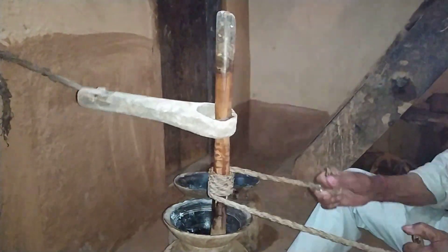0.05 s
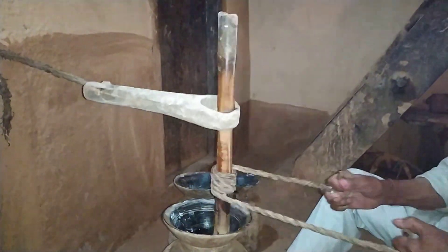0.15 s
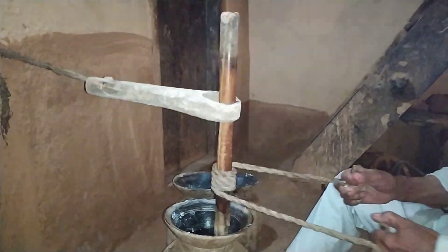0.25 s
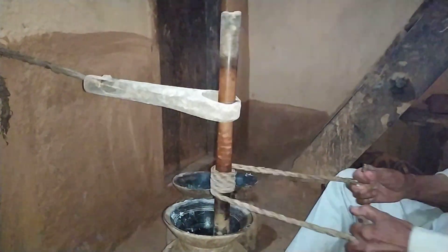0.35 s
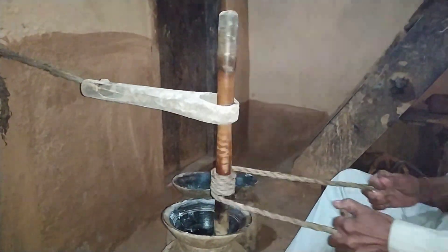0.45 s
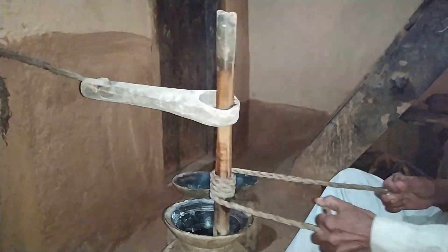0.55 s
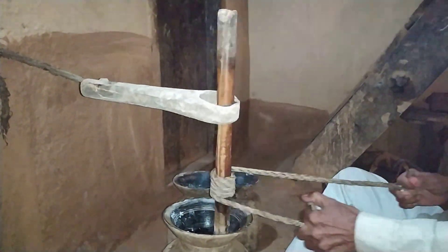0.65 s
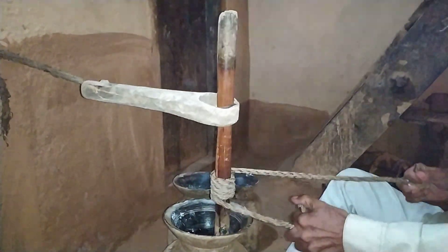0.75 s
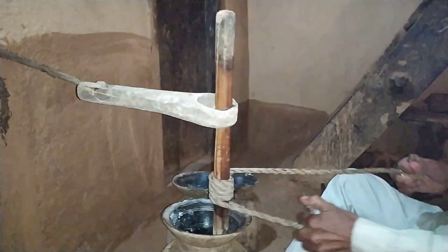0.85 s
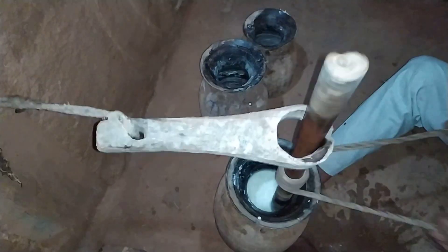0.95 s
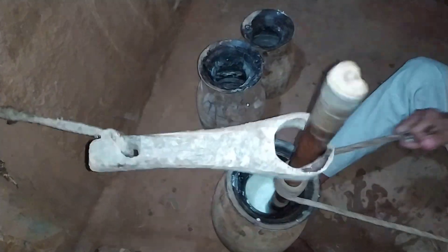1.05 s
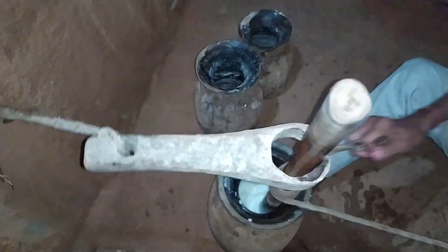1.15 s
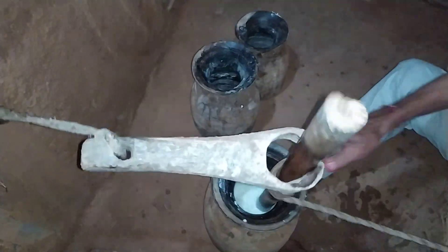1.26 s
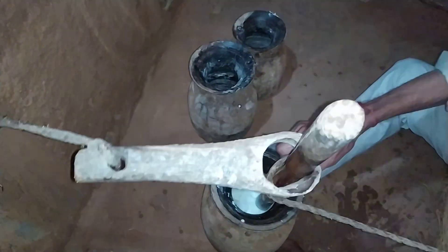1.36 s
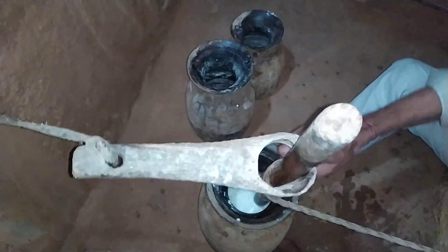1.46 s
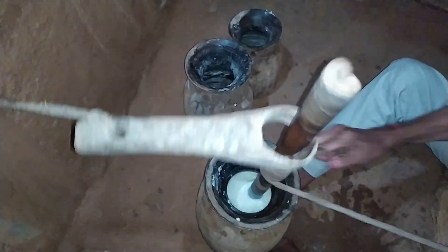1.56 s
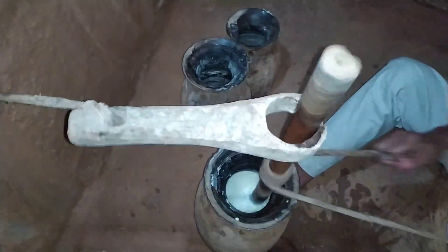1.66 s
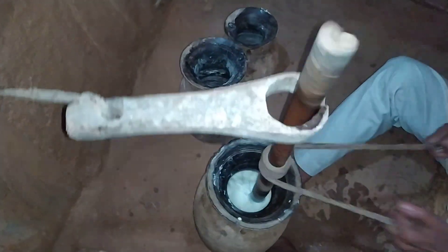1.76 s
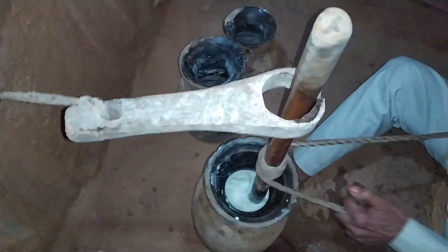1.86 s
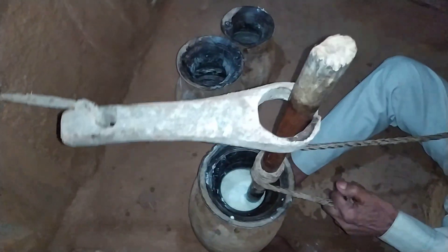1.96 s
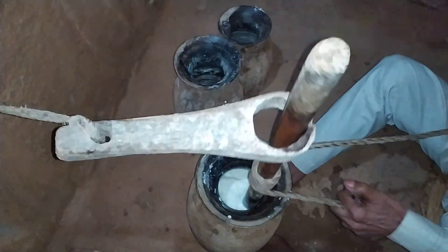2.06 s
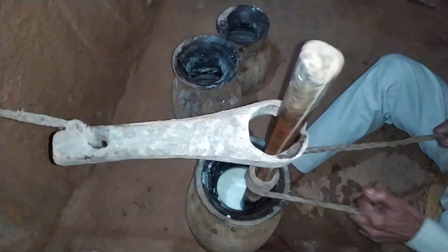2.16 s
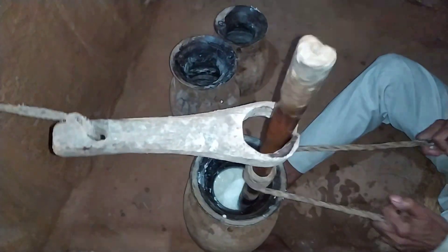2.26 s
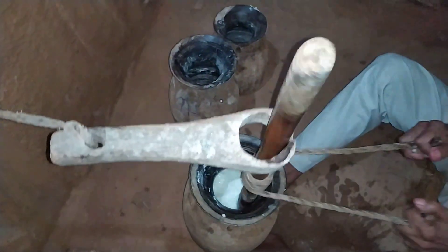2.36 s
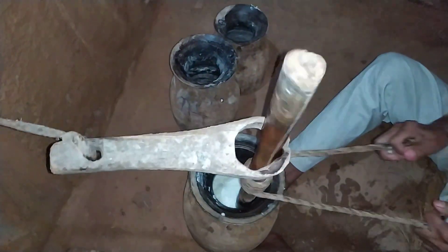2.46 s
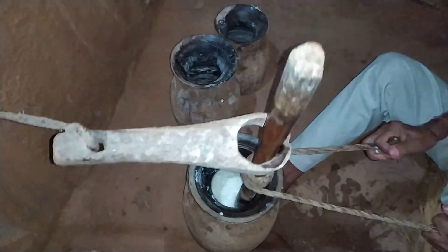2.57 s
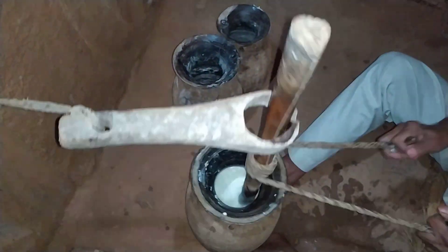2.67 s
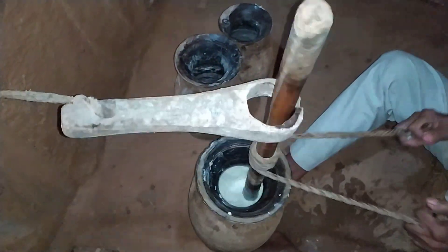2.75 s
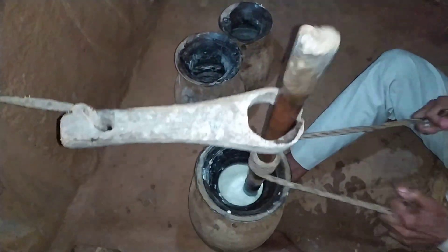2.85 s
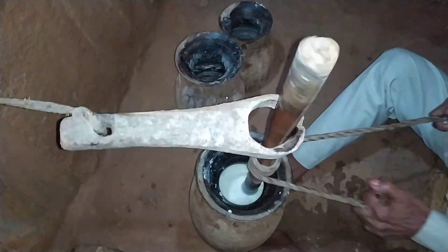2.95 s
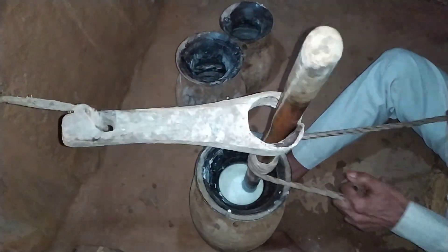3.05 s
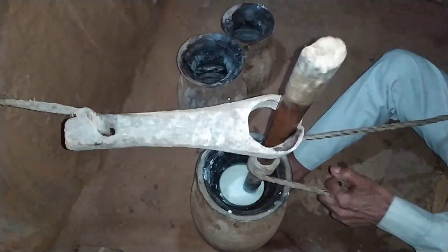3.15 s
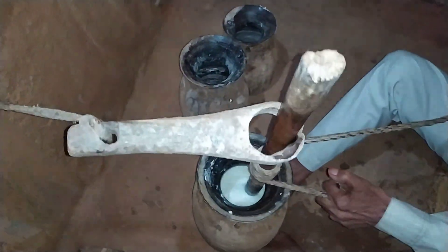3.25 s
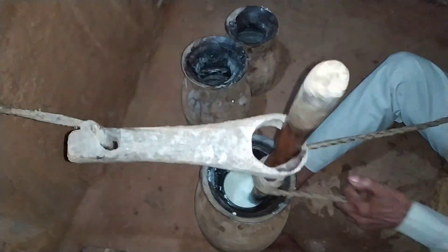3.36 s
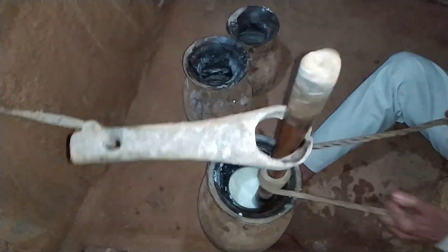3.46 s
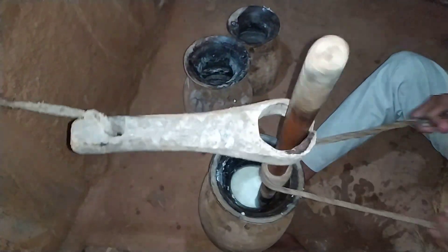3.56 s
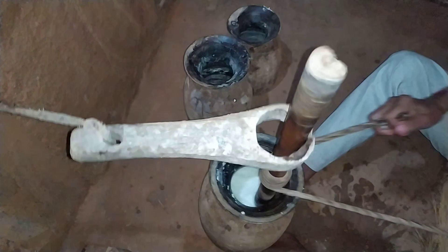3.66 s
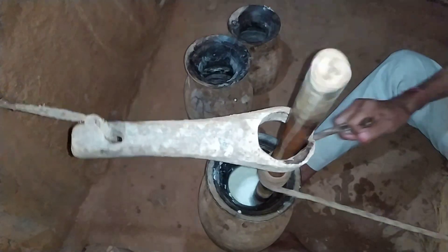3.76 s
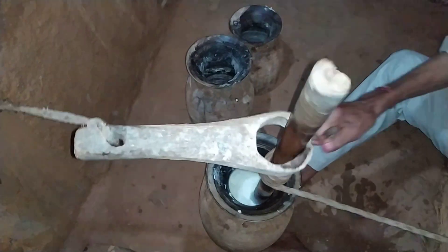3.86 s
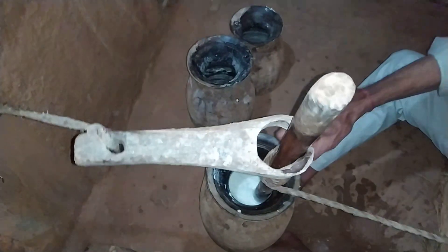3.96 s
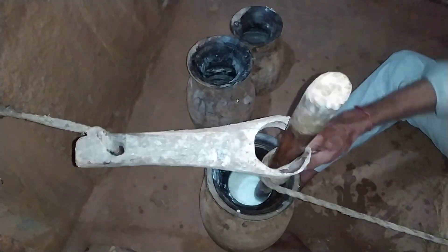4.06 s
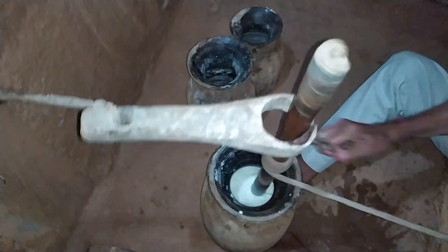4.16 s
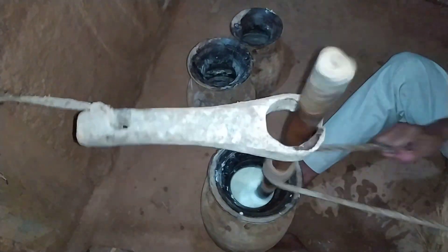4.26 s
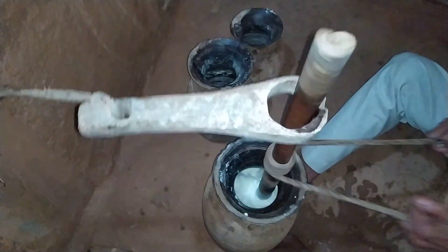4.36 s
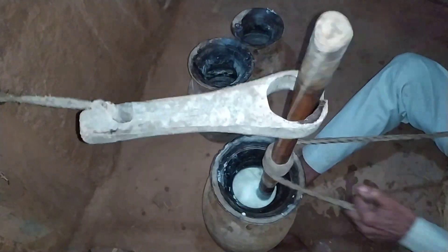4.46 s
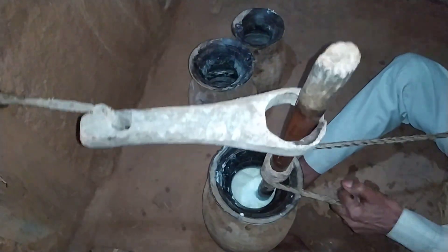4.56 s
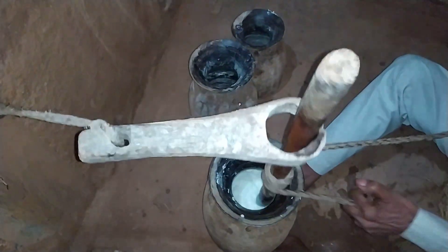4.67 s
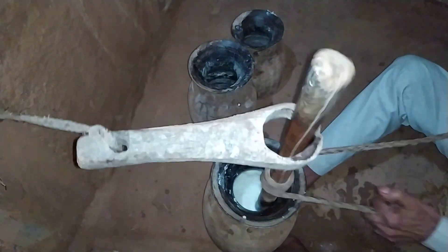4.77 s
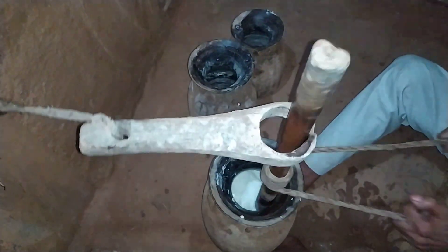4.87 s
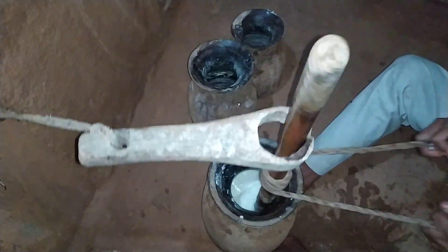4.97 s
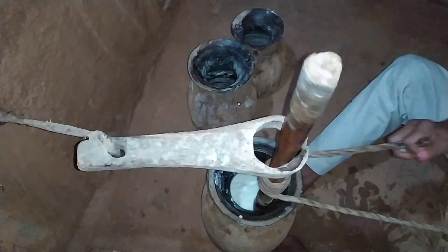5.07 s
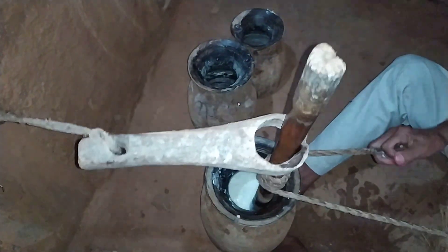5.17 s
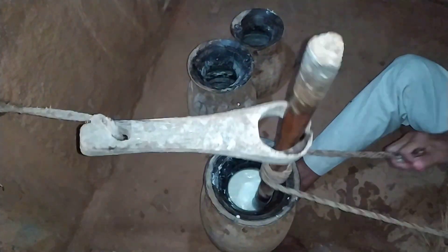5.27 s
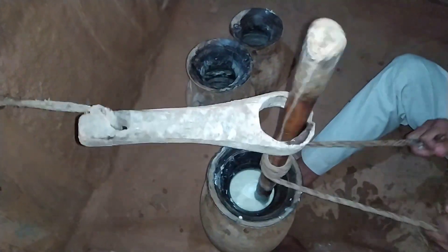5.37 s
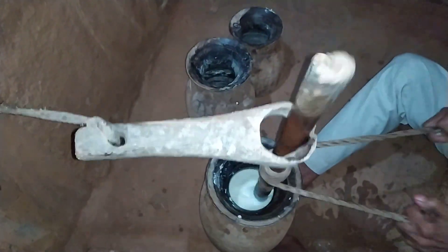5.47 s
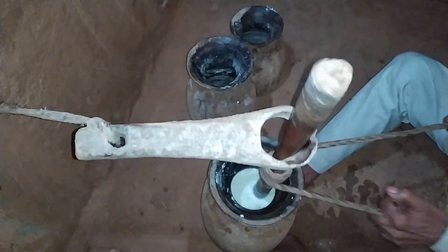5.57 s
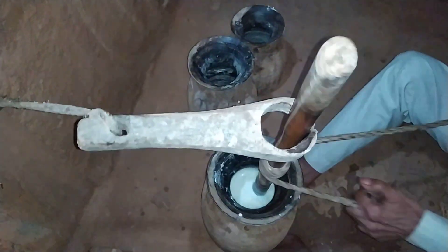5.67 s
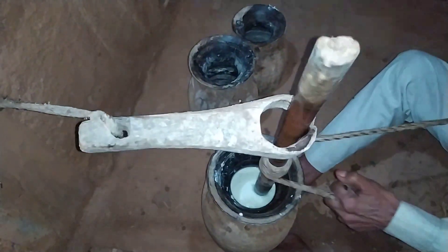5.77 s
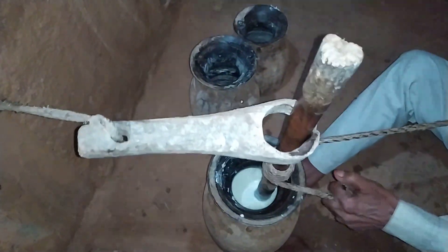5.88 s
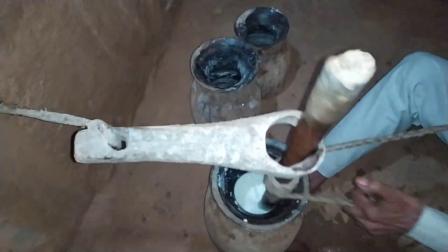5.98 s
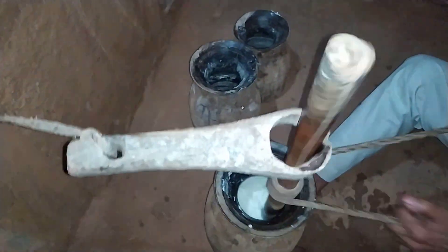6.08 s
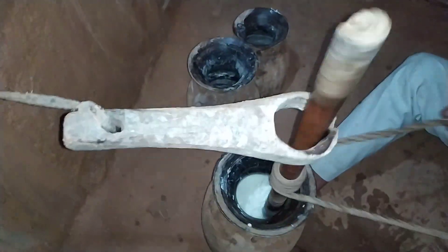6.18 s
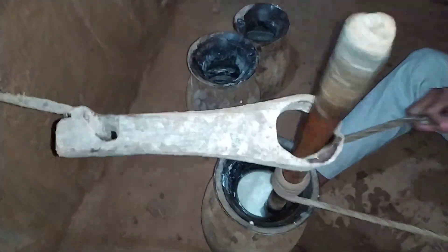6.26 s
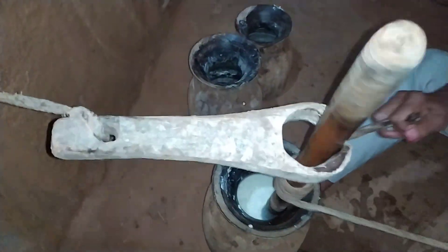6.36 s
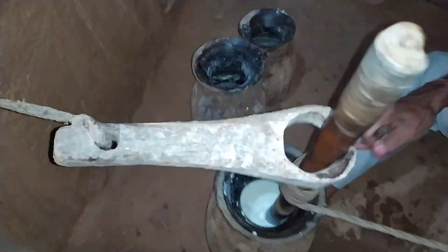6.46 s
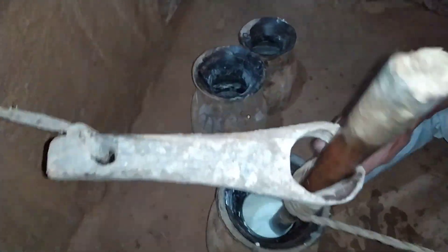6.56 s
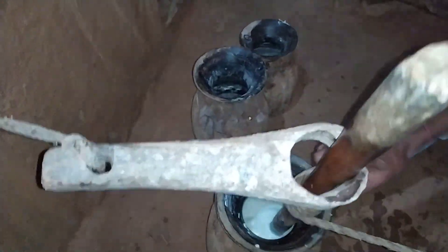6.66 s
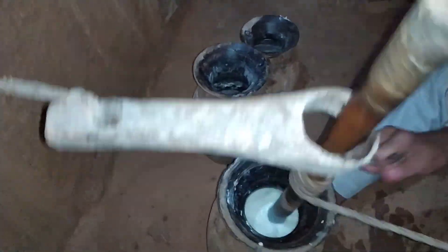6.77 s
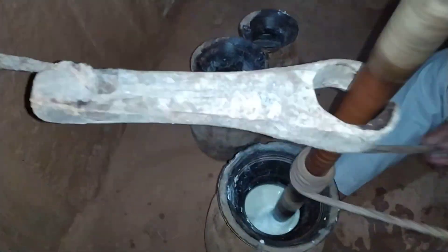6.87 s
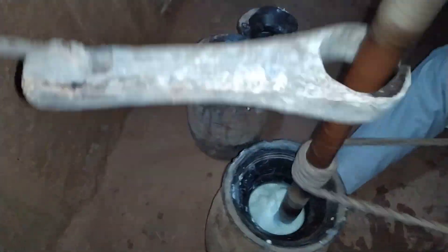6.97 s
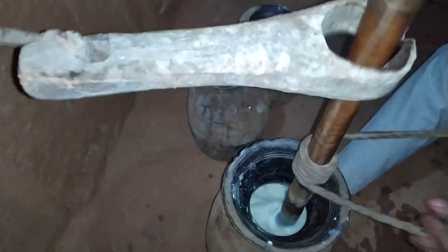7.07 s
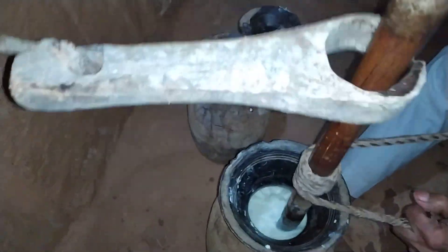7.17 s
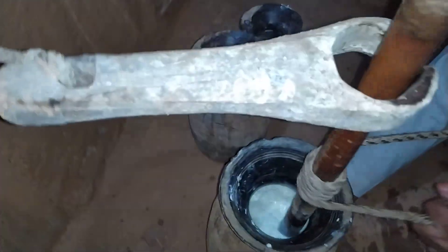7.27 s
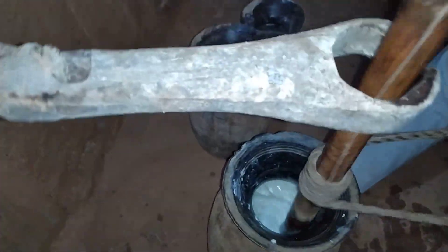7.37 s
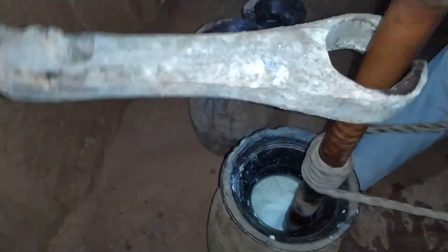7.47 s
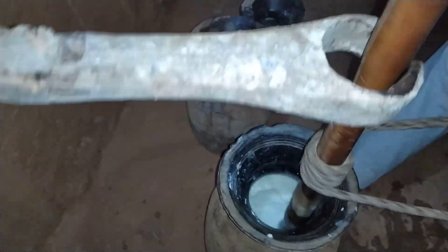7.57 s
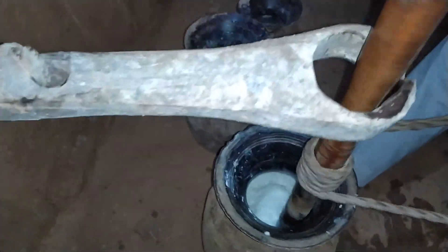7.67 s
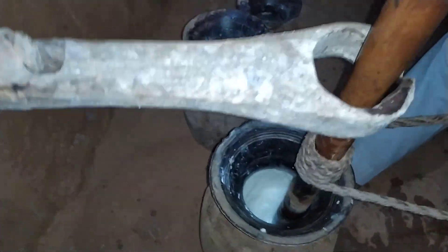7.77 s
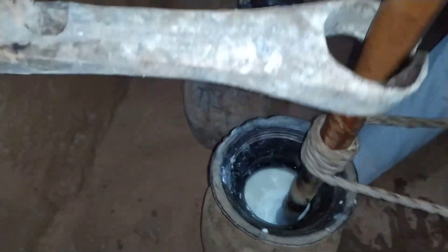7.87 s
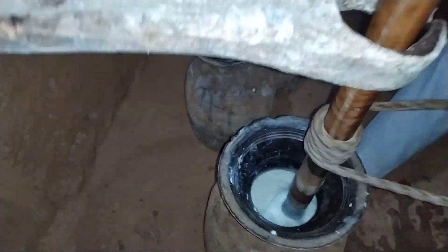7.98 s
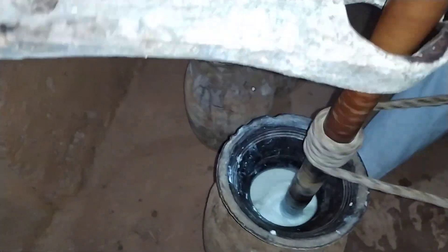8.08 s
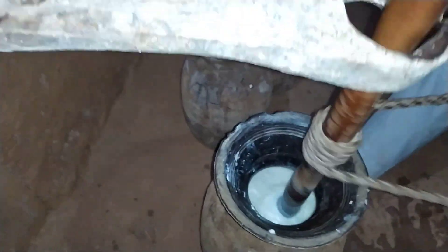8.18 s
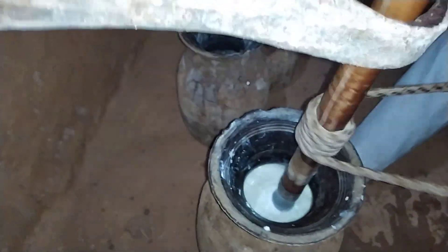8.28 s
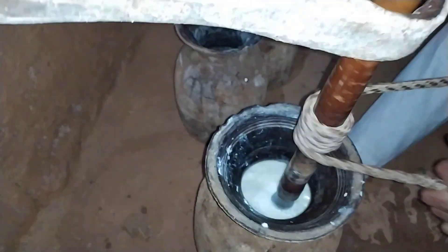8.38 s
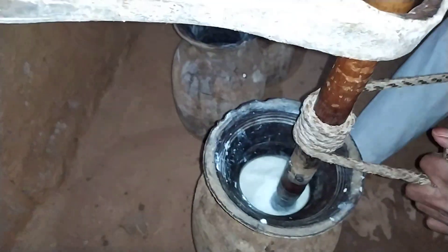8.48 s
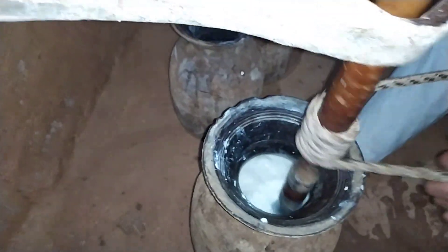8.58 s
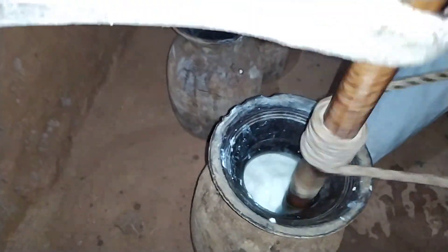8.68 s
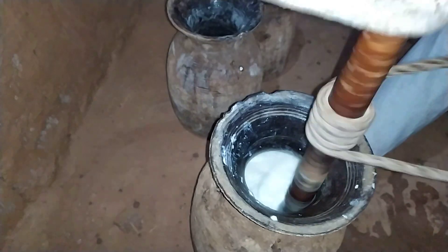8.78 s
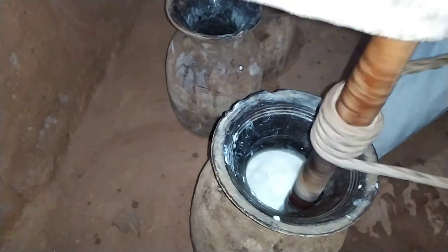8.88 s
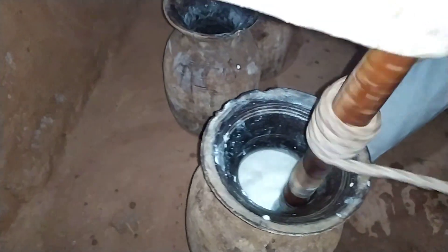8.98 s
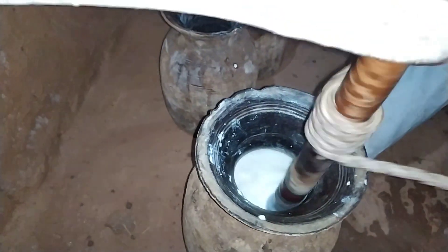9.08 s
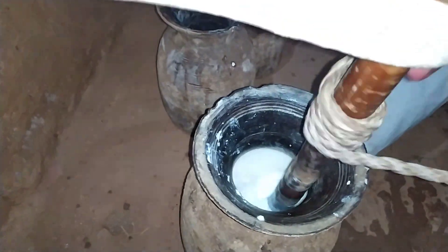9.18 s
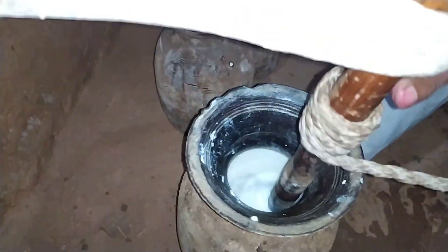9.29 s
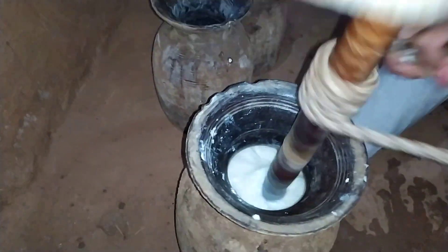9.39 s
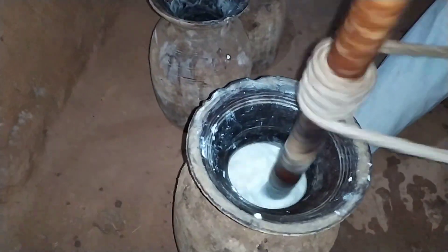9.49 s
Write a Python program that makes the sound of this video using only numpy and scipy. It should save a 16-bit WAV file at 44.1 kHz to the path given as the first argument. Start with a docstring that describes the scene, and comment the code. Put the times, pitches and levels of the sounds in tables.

```python
"""Churning milk by hand

A wooden churning stick is spun to and fro by a rope in a clay pot of milk, in a small earthen room.
The paddle gulps air under the milk: swelling tones drive the pot's air resonances into booms.
The shaft's clacks are noise bursts through wood rings; rubbing and rope rasps are trains of stick-slip
clicks. Froth is filtered clicks that grow with the stick's speed; hard and gentle pulls alternate."""
import sys
import numpy as np
from scipy import signal
from scipy.fft import rfft, irfft
from scipy.io import wavfile
from scipy.ndimage import uniform_filter1d

SR = 44100
rng = np.random.default_rng(int(sys.argv[2]) if len(sys.argv) > 2 else 0)


def wav_record(signal):
    """Record a signal, one row per channel, as 16-bit PCM in the file named by sys.argv[1]."""
    frames = np.transpose(np.atleast_2d(signal))
    bounded = np.clip(frames, -1, 1)
    # unit amplitude maps onto the largest positive 16-bit level
    quanta = np.round(bounded * 32767).astype(np.int16)
    wavfile.write(sys.argv[1], SR, quanta)


N = 420273
TIME = np.arange(N) / SR
CONTROL_TIME = TIME[::100]  # coarse steps for slow movements
SIDES = np.array([[1], [-1]])  # adds a side signal to the left, subtracts it from the right

# pulls of the rope: (start [s], run-up [s], run-down [s],
#   sloshing at full speed [dB], rubbing at full speed [dB], froth hiss at full speed [dB])
ROPE_PULLS = [(0.102, 0.37, 0.11, -43, -68, -55), (0.779, 0.27, 0.37, -26.5, -35.5, -47.5),
              (1.485, 0.15, 0.3, -20.5, -22.5, -31.5), (1.989, 0.11, 0.46, -39, -43, -55.5),
              (2.55, 0.23, 0.36, -42, -56, -56.5), (3.229, 0.38, 0.32, -31.5, -44.5, -50.5),
              (4.03, 0.24, 0.28, -22, -34.5, -42), (4.581, 0.24, 0.32, -36, -45, -56),
              (5.13, 0.26, 0.44, -40.5, -57, -57), (5.901, 0.29, 0.46, -31, -41, -50),
              (6.65, 0.24, 0.29, -20.5, -24, -39.5), (7.19, 0.2, 0.35, -35, -40, -53),
              (7.75, 0.23, 0.44, -40.5, -54.5, -54), (8.461, 0.26, 0.53, -31, -43, -48),
              (9.271, 0.23, 0.26, -22.5, -21, -36.5)]
# clearest knocks of the shaft on its holder:
#   (time [s], strength [dB], scrape [0 clean knock - 1 swelling scrape], hollow body [dB re strength])
HOLDER_KNOCKS = [(0.115, -5, 0.03, -8), (0.503, -8.5, 0.39, -4), (0.839, 1, 0.88, -3),
                 (0.912, 4.5, 0.11, -1), (1.001, 9.5, 0.096, -3), (1.093, 4.5, 0.24, -3.5),
                 (1.161, 9, 0.18, -1.5), (1.251, -3.5, 0.13, 2), (1.564, 13.5, 0.27, -3),
                 (1.648, 15, 0.25, -4.5), (1.722, 10, .1, -5), (1.785, 7.5, .56, -7),
                 (2.097, 0.5, 0.31, -6), (2.163, -1.5, 0.32, -5), (2.269, -0.5, 0.078, -4),
                 (2.343, -8, 0.38, -1.5), (2.467, -10, .13, -7), (2.818, -9.5, .4, -1.5),
                 (3.404, -3.5, 0.63, 1.5), (3.481, -12.5, .14, 7), (3.53, -5.5, 0.17, -7),
                 (3.57, 4.5, .1, -2), (3.582, 4.5, 0.57, 2), (3.654, 6.5, 0.16, -3), (3.77, -4, .64, 2.5),
                 (4.143, 4.5, 0.34, -3), (4.218, 8, 0.37, -6), (4.24, 10.5, 0.62, -5),
                 (4.319, 7, 0.074, -6), (4.331, 7.5, .15, -6.5), (4.385, 10, 0.57, -7.5),
                 (4.473, 4.5, 0.29, -4), (4.639, -7, 0.17, -3), (4.698, -8.5, 0.26, -2.5),
                 (4.758, -1, .8, 0), (4.861, 1, 0.099, -3), (4.935, -10.5, 0.48, 1.5),
                 (4.975, -8.5, 0.79, -1.5), (5.175, -10.5, 0.15, -0.5), (5.234, -6, 0.13, -3.5),
                 (5.478, -10.5, 0.19, -5.5), (6.063, .5, 0.4, 0), (6.133, 1.5, 0.076, -1),
                 (6.22, 4, 0.33, 2.5), (6.299, 6.5, 0.05, -3), (6.308, 3.5, 0.13, -6),
                 (6.374, -2, 0.69, -0.5), (6.429, -6, 0.43, 2), (6.72, -3, .05, 1.5),
                 (6.757, 1.5, .13, -3.5), (6.81, -6.5, .12, 1), (6.846, 7.5, .12, -1),
                 (6.866, 10.5, .55, -3), (6.942, 12, 0.063, -7), (6.949, 8.5, .12, -2), (7.0, 11.5, .3, -5),
                 (7.025, 10.5, 0.31, -7), (7.099, 7.5, .14, -4), (7.274, 1, 0.33, -3),
                 (7.315, -0.5, .15, -3), (7.475, 3.5, 0.032, -1.5), (7.542, -2.5, 0.3, -1.5),
                 (7.791, -9.5, 0.085, -1.5), (7.856, -3.5, .07, -7), (8.095, -5.5, 0.047, -4),
                 (8.686, 0, 0.073, -0.5), (8.738, -1, .16, 2.5), (8.835, 7.5, 0.047, -9.5),
                 (8.843, -1, 0.069, 7), (8.914, 7.5, .03, -4.5), (8.928, 1, 0.078, -2),
                 (8.999, 5, .05, -5.5), (9.011, 4.5, .1, -7.5), (9.034, 1, 0.033, -3),
                 (9.159, -13.5, 0.16, 2), (9.35, 2.5, 0.22, 1), (9.364, 6.5, 0.066, -8),
                 (9.427, 5, 0.037, -1), (9.456, 12, .2, 0), (9.476, 16, 0.25, -11),
                 (9.487, 11.5, .25, -0.5)]
# big gulps of air behind the paddle: (time [s], swell [s], pitch [Hz], peak boom [dB], opening plop [dB])
BIG_GULPS = [(0.845, 0.011, 287, -21.5, -24), (0.886, 0.012, 302.6, -14, -24),
             (0.986, 0.015, 300, -13, -14), (1.044, .015, 306, -15.5, -23), (1.152, .013, 302, -15.5, -23),
             (1.209, .014, 302.7, -18.5, -21), (1.485, 0.0095, 301, -31, -35),
             (1.541, 0.0056, 314.6, -21.5, -16), (1.579, 0.017, 306.3, -9.5, -13),
             (1.618, 0.018, 307, -10, -27), (1.714, .013, 297.4, -24, -37), (2.158, 0.0078, 283, -32, -42),
             (2.303, 0.0061, 300.6, -32.5, -49), (2.636, 0.006, 300, -38, -57),
             (2.728, .009, 301.6, -31.5, -36), (2.784, 0.013, 304, -31, -39),
             (2.827, 0.0035, 281, -30.5, -48), (2.89, 0.0035, 309, -33.5, -48),
             (3.447, 0.009, 295.3, -15.5, -23), (3.503, 0.0073, 291, -20, -28),
             (3.572, 0.015, 296, -18, -19), (3.617, 0.012, 295.5, -14.5, -36),
             (3.813, .01, 302, -17.5, -18), (3.895, 0.0074, 303, -31, -34), (4.071, .012, 302, -35, -40),
             (4.099, 0.017, 308, -21, -24), (4.18, 0.017, 287.5, -14, -16.5),
             (4.228, 0.014, 303, -16.5, -34), (4.762, 0.0049, 288, -30, -42),
             (4.88, 0.012, 298.8, -30, -40), (5.258, 0.015, 302, -30, -31),
             (5.358, 0.0093, 299.8, -30, -44), (5.385, 0.008, 304, -42.5, -47),
             (5.412, 0.011, 305, -29, -35), (5.447, 0.0078, 306, -30.5, -46),
             (5.535, 0.0046, 290, -41, -51), (5.951, 0.0071, 303, -33, -47), (6.067, 0.01, 301.5, -18, -23),
             (6.112, 0.016, 303, -11.5, -29), (6.16, 0.0076, 292, -17.5, -24),
             (6.206, .011, 305, -11.5, -30), (6.271, 0.0072, 302.5, -20, -19),
             (6.721, 0.0022, 317.4, -30, -28), (6.757, 0.0084, 287, -29, -33),
             (6.81, .004, 305, -27, -18.5), (6.845, 0.0049, 303, -19, -20), (6.864, 0.012, 303, -20, -15),
             (6.91, .0066, 311.3, -20, -30), (7.377, 0.01, 265, -31, -45), (7.5, .0049, 296, -31, -37),
             (7.968, .005, 323, -29.5, -33), (8.022, .0087, 302, -31.5, -23.5),
             (8.265, 0.0031, 310, -42, -43), (8.307, 0.0055, 312, -41, -42),
             (8.665, .0021, 303.5, -21, -19), (8.703, 0.0034, 310, -18, -13),
             (8.723, 0.0052, 306.6, -16, -18), (8.759, .012, 306, -15.5, -14),
             (8.869, .01, 317.4, -15, -13), (8.99, 0.003, 315, -13, -19),
             (9.059, 0.0021, 314.4, -14.5, -14), (9.306, .0019, 313.4, -25, -21.5),
             (9.332, 0.0037, 313, -17, -28), (9.362, .0021, 320, -17.5, -17),
             (9.411, .013, 309.7, -7, -6.5), (9.471, 0.0086, 314, -14.5, -14)]
# resonances of the air in the pot, coupled to the room: (frequency [Hz], relative level [dB], t60 [s])
POT_AIR = [(176.2, -27, 0.46), (250.4, -1.5, 0.14), (279.8, -3, 0.16), (318.45, -2.5, 0.24),
           (386, -15.5, 0.2), (431.8, -8.5, 0.18)]
# colour of wood striking wood and clay: (frequency [Hz], relative level [dB])
WOOD_COLOUR = [(40, -29.5), (160, -5.5), (270, -10), (460, 3), (640, -21), (830, -2.5), (1250, -7),
               (1750, -10), (2200, -7), (2900, -9), (3600, -15.5), (9300, -14), (12500, -25), (16000, -41)]
# ringing of shaft, holder and pot wall: (frequency [Hz], relative level [dB], t60 [s])
WOOD_RINGS = [(862, 5, 0.12), (1067, -31, 0.08), (1312, 12, 0.031), (1652, 10.5, 0.036), (2133, 0.5, 0.058),
              (2430, 16, 0.0087), (2840, 24, 0.0072), (4120, 14.5, 0.006), (5900, -3, 0.02)]
# colour of bursting froth: (frequency [Hz], relative level [dB])
FROTH_COLOUR = [(2500, -14.5), (4500, -9.5), (6500, -8.5), (9000, -1.5), (11500, -5.5), (16000, -16.5)]
# colour of the still air of the room: (frequency [Hz], relative level [dB])
AIR_COLOUR = [(25, 4), (50, 12.5), (120, -5), (280, 4.5), (600, -4), (1000, -6.5), (3000, -12.5),
              (9000, -19), (16000, -29.5)]
# small bubbles and drops in the pot: (time [s], starting pitch [Hz], level [dB])
BUBBLE_PLINKS = [(1.959, 2540, -30), (2.826, 995, -29), (5.441, 1160, -33), (6.63, 748, -31),
                 (8.931, 1033, -10.5), (9.038, 1270, -21)]
# the microphone moves in over the pot: (time [s], nearness [0-1])
MIC_NEARNESS = [(0, 0.17), (8.0, 0.4), (8.7, 0.84), (9.5, 1)]
# lone dry ticks: (time [s], level [dB])
DRY_TICKS = [(1.961, -17), (3.921, -29), (5.826, -24), (6.634, -24), (7.775, -32), (8.429, -22),
             (9.295, -23)]
# the taut rope drags on the shaft: (time [s], length [s], level [dB], main resonance halfway [Hz])
ROPE_RASPS = [(0.794, 0.065, -44, 940), (1.242, 0.025, -33, 865), (1.294, 0.062, -43, 950),
              (1.511, 0.062, -27.5, 1000), (1.73, 0.031, -26, 950), (2.034, 0.091, -37.5, 1090),
              (3.316, 0.041, -50, 1073), (3.475, 0.026, -29.5, 840), (3.913, 0.037, -52, 1100),
              (4.1, 0.062, -29, 990), (4.217, 0.091, -27, 976), (4.343, 0.051, -22, 942),
              (4.685, 0.033, -41.5, 1010), (6.39, 0.067, -33, 1090), (6.526, 0.027, -57, 990),
              (6.739, 0.064, -50, 1062), (6.857, 0.05, -19, 975), (6.953, 0.024, -18.5, 860),
              (7.053, 0.031, -27.5, 1085), (7.222, 0.024, -40, 958), (7.373, 0.052, -37, 930),
              (8.739, 0.023, -32, 1040), (8.854, 0.036, -27, 1030), (9.181, .025, -51, 960),
              (9.349, 0.083, -23.5, 1068), (9.471, 0.047, -18, 1020)]
# what each slip of the rope rings:
#   (multiple of the main resonance [ratio], relative level [dB], t60 [s])
ROPE_RINGS = [(.87, -22.5, 0.021), (1.0, 9, 0.028), (1.38, 5, 0.022), (1.66, 2.5, 0.011),
              (2.2, 3.5, 0.0068), (2.5, -2, 0.018), (2.85, 3.5, 0.005)]
# colour of the shaft grinding in its holder: (frequency [Hz], relative level [dB])
GRIND_COLOUR = [(60, -34), (180, -5.5), (420, -1), (640, -15), (850, 0), (1400, -6.5), (1800, -11),
                (2200, -4.5), (2950, -10.5), (3600, -16.5), (6000, -21.5), (14000, -36)]
# the paddle slaps the surface of the milk: (time [s], level [dB])
MILK_SLAPS = [(0.887, -12.5), (1.152, -14), (3.448, -19), (6.113, -10), (6.207, -3.5), (6.865, -12),
              (8.99, -14), (9.363, -11)]

# levels that drive the sounds while the stick rests
REST_SLOSH_DB, REST_RUB_DB, REST_HISS_DB = -52, -76, -62
# at full speed: blades passing through the milk, and sways of the shaft in its holder
BLADES_PER_S, SWAYS_PER_S = 19, 14
SLOSH_LEAD_S = 0.047
# crisp edge of a clean 0 dB knock, its gain per dB of strength (harder is brighter), change in a full scrape
EDGE_DB, EDGE_DB_PER_DB, SCRAPE_EDGE_DB = -15.5, 1.8563, -3
# at first the microphone is beside the pot, whose rim hides the froth
BESIDE_UNTIL_S, RIM_SHADOW_DB = .79, -7
ROOM_T60_S, EARLY_S = 0.46, 0.018
TOP_HZ = 16000


def undb(db):
    """Decibels to gain."""
    return 10 ** (np.asarray(db) / 20)


def unit(x):
    """Scale a response to unit energy."""
    return x / np.sqrt(np.sum(x ** 2, axis=-1, keepdims=True))


def steady(x, span_s):
    """Even out slow swells, leaving rms near 1 and the quick grain."""
    power = uniform_filter1d(np.mean(np.atleast_2d(x) ** 2, axis=0), int(span_s * SR))
    return x / np.sqrt(np.abs(power) + 1e-12)


def through(x, response):
    """Play a sound through a response; either may be stereo."""
    return signal.fftconvolve(np.atleast_2d(x), np.atleast_2d(response), axes=1)[:, :N]


def band(x, hz, kind, order=3):
    """Low-pass, high-pass or band-pass."""
    return signal.sosfilt(signal.butter(order, hz, kind, fs=SR, output="sos"), x)


def peak(x, hz, q):
    """Pick out one resonance."""
    return signal.lfilter(*signal.iirpeak(hz, q, fs=SR), x)


def colour(points, size=2048):
    """Causal unit-energy response with the given (Hz, dB) spectrum."""
    hz, db = np.transpose(points)
    bins_hz = np.arange(size // 2 + 1) * SR / size
    gain = undb(np.interp(np.log(bins_hz + 1), np.log(hz), db))
    # folding the cepstrum forward gives minimum phase: the energy comes first
    cepstrum = irfft(np.log(gain))
    cepstrum[1:size // 2] *= 2
    cepstrum[size // 2 + 1:] = 0
    return unit(irfft(np.exp(rfft(cepstrum))))


def ring(modes, stretch=1, against=0, size=8000):
    """Damped sines; the first `against` of them start in the opposite sense."""
    t = TIME[:size]
    out = np.zeros(size)
    for k, (hz, db, t60) in enumerate(modes):
        sense = -1 if k < against else 1
        decay = np.exp(-np.log(1000) * t / t60)
        out += sense * undb(db) * decay * np.sin(2 * np.pi * hz * stretch * t)
    return out


def add(track, s, sound):
    """Mix a sound in at a time."""
    start = max(round(s * SR), 0)
    track[..., start:start + sound.shape[-1]] += sound[..., :max(N - start, 0)]


def grains(per_s, spread_db):
    """Random clicks of widely differing size."""
    chance, size, sign = rng.random(N), rng.standard_normal(N), rng.choice([-1, 1], N)
    return (chance < per_s / SR) * sign * undb(spread_db * np.clip(size, -2, 2))


def nearness(s):
    """How close the microphone is to the pot's mouth, 0-1."""
    return np.interp(s, *np.transpose(MIC_NEARNESS))


def spin(start, run_up, run_down):
    """Speed of the stick during one pull, 0-1: it gathers speed, then coasts to a stop."""
    corners_s = [start, start + run_up, start + run_up + run_down]
    return np.sin(np.pi / 2 * np.interp(CONTROL_TIME, corners_s, [0, 1, 0]))


def driven(speeds, rest_db, full_db, curve):
    """A level in dB that rises with speed from rest to each pull's own value."""
    rises = [(db - rest_db) * speed ** curve for speed, db in zip(speeds, full_db)]
    return rest_db + np.interp(TIME, CONTROL_TIME, np.max(rises, axis=0))


def passes(speed, per_s, uneven=.2):
    """Samples at which something on the turning stick comes round again, a little unevenly."""
    turned = np.cumsum(speed) * per_s / SR
    marks = np.arange(1, 400) + uneven * rng.standard_normal(399)
    return np.searchsorted(turned, marks[marks < turned[-1]])


def air(level_db=-63, side_db=-7):
    """Faint steady background: coloured noise, partly different on each side."""
    mid, side = through(rng.standard_normal((2, N)), colour(AIR_COLOUR))
    return undb(level_db) * (mid + undb(side_db) * side * SIDES)


def rumble(slosh_db, floor_db=-41, follow=0.53, low_hz=55, top_hz=150, side_db=-6):
    """As the paddle labours in the milk, its foot grinds on the pot's bottom and shakes the floor."""
    noise = band(rng.standard_normal((2, N)), top_hz, "low", order=2)
    mid, side = steady(band(noise, low_hz, "high", order=4), span_s=0.13)
    return (mid + undb(side_db) * side * SIDES) * undb(follow * slosh_db + floor_db)


def pot(near=0, stretch=1, near_db=-5):
    """The boom swells, then throbs as close resonances beat; from nearby the lowest three matter less."""
    modes = [(hz, db + near * near_db * (k < 3), t60) for k, (hz, db, t60) in enumerate(POT_AIR)]
    return ring(modes, stretch, against=3)


def gulp(near, swell_s, hz, centre_hz=300, rise_per_s=0.96):
    """A pocket of air grows, rising in pitch, and drives the pot's boom until it breaks; peak 1."""
    t = TIME[:int(swell_s * SR)]
    pocket = t * np.sin(2 * np.pi * hz * t * (1 + rise_per_s * (t - swell_s)))
    boom = signal.fftconvolve(pocket, pot(near, hz / centre_hz))
    return boom / np.max(np.abs(boom))


def small_gulps(speed, slosh_db, boom_db=-2, plop_db=-10, scatter_db=4.0, swell_s=.007,
                pitch_hz=295, pitch_spread=0.0534):
    """Every passing blade drags a little air under, as strongly as the milk is moving."""
    chance = rng.standard_normal((400, 2)) * [scatter_db, pitch_spread]
    gulps = []
    for i, (size, bend) in zip(passes(speed, BLADES_PER_S), chance):
        level_db = slosh_db[i] + size
        gulps.append((i / SR, swell_s, pitch_hz * (1 + bend), level_db + boom_db, level_db + plop_db))
    return gulps


def milk(slosh_db, gulps, tumble_db=-10, plop_t60_s=0.034, slap_hz=490, slap_t60_s=0.0048,
         soft_hz=1200, leak_hz=165):
    """Gulps open with a plop and swell into a boom of the pot's air; small ones tumble; the paddle slaps."""
    tumbling = through(grains(per_s=90, spread_db=6.5), pot())[0]
    out = steady(tumbling, span_s=0.076) * undb(slosh_db + tumble_db)
    for s, swell_s, hz, boom_db, plop_db in gulps:
        add(out, s, undb(boom_db) * gulp(nearness(s), swell_s, hz))
        plop = ring([(hz, 0, plop_t60_s)], size=3072)
        add(out, s, undb(plop_db) * band(plop, soft_hz, "low", order=2))
    slap = band(ring([(slap_hz, 0, slap_t60_s)], size=1024), soft_hz, "low", order=2)
    for s, db in MILK_SLAPS:
        add(out, s, undb(db) * slap)
    return band(out, leak_hz, "high", order=2)  # an open pot radiates little deep bass


def grip(speed, swing_db=4.0, per_s=60):
    """The shaft presses unevenly on its holder as it turns: a quick random swing in dB."""
    swing = np.interp(TIME * per_s, np.arange(1000), rng.standard_normal(1000))
    return swing_db * np.sqrt(np.abs(speed)) * swing


def rubbing(rub_db):
    """The turning shaft sticks and slips in quick uneven steps."""
    slips = through(grains(per_s=750, spread_db=9), colour(GRIND_COLOUR))[0]
    return steady(slips, span_s=0.79) * undb(rub_db)


def froth(hiss_db):
    """Spray and tiny bursting bubbles: a dense fizz of coloured clicks."""
    bursts = through(grains(per_s=4100, spread_db=7.5), colour(FROTH_COLOUR))[0]
    return steady(bursts, span_s=0.064) * undb(hiss_db)


def wood(ring_db=-8, patchy_db=3, mode_spread_db=3, detune=0.015):
    """A dry crack and a few short rings; each point of contact shifts and weights them differently."""
    def vary(spread):
        """An even random offset."""
        return spread * rng.uniform(-1, 1)

    crack = colour([(hz, db + vary(patchy_db)) for hz, db in WOOD_COLOUR])
    modes = [(hz * (1 + vary(detune)), db + vary(mode_spread_db), t60) for hz, db, t60 in WOOD_RINGS]
    response = undb(ring_db) * unit(ring(modes, size=3072))
    add(response, 0, crack)
    return unit(response)


def light_taps(speed, rub_db, tap_db=20, scatter_db=3, scrape=0.46, hollow_db=-1):
    """The swaying shaft grazes its holder again and again, as hard as it is rubbing."""
    sizes = scatter_db * rng.standard_normal(400)
    hits = zip(passes(speed, SWAYS_PER_S), sizes)
    return [(i / SR, rub_db[i] + size + tap_db, scrape, hollow_db) for i, size in hits]


def clacks(contacts, body_hz=1900, split_hz=4200, bite_db=-4.0, bite_db_per_db=0.27, clean_scrape=0.24,
           chatter_s=0.0008, swell_s=0.03, bounce_hz=1500, rebound_s=.011, rebound_db=-9, thin_hz=130):
    """The shaft hits its holder, rebounds and chatters; a glancing contact swells into a scrape instead."""
    out, t = np.zeros(N), TIME[:SR // 16]
    for s, woody_db, scrape, hollow_db in contacts:
        pressure = (1 - np.exp(-t / (swell_s * scrape))) * np.exp(-t / (chatter_s + swell_s * scrape))
        bounces = rng.choice([-1, 1], len(t)) * (rng.random(len(t)) < bounce_hz / SR) * pressure
        crack = np.exp(-scrape / clean_scrape)  # only a square hit cracks
        blow = np.sqrt(1 - crack ** 2) * unit(bounces)
        blow[0] += crack
        blow[int(rebound_s * rng.uniform(.7, 1.3) * SR)] += crack * undb(rebound_db)
        knock = signal.fftconvolve(blow, wood())
        body = unit(band(knock, body_hz, "low"))
        bite = unit(band(knock, [body_hz, split_hz], "band"))
        edge = unit(band(knock, split_hz, "high"))
        # harder blows bite more and have a crisper edge
        bite_gain = undb(bite_db + bite_db_per_db * woody_db)
        add(out, s, undb(woody_db) * (undb(hollow_db) * body + bite_gain * bite))
        add(out, s, undb(EDGE_DB + EDGE_DB_PER_DB * woody_db + SCRAPE_EDGE_DB * scrape) * edge)
    return band(out, thin_hz, "high", order=1)


def rasps(slips_per_s=240, uneven=.45, scatter_db=3, glide=.07, jitter=0.048, dull_hz=3400, thin_hz=720):
    """The rope slips in uneven jerks; resonances rise as it tightens, and the fibres mute the treble."""
    out = np.zeros(N)
    for s, length, db, hz in ROPE_RASPS:
        chance = rng.standard_normal((60, 3))
        times = np.cumsum(np.exp(uneven * chance[:, 0])) / slips_per_s
        for at, (_, size, bend) in zip(times[times < length], chance):
            main_hz = hz * (1 + glide * (at / length - .5) + jitter * bend)
            swell = np.sqrt(np.sin(np.pi * at / length) * SR / slips_per_s)
            slip = unit(ring(ROPE_RINGS, main_hz, size=1024))
            add(out, s + at, undb(db + scatter_db * size) * swell * slip)
    return band(band(out, dull_hz, "low", order=6), thin_hz, "high")


def plinks(t60_s=0.019, rise_per_s=3.0):
    """A small bubble rings briefly, rising in pitch."""
    out, t = np.zeros(N), TIME[:SR // 12]
    decay = np.exp(-np.log(1000) * t / t60_s)
    for s, hz, db in BUBBLE_PLINKS:
        add(out, s, undb(db) * decay * np.sin(2 * np.pi * hz * t * (1 + rise_per_s * t)))
    return out


def ticks(low_hz=3500):
    """Tiny bright ticks, as of flung drops landing."""
    out = np.zeros(N)
    tick = unit(band(colour(FROTH_COLOUR), low_hz, "high", order=2))
    for s, db in DRY_TICKS:
        add(out, s, undb(db) * tick)
    return out


def passed_holder(x, near, boxy_hz=740, q=3.4, depth=0.28):
    """As the microphone moves past the holder, the holder's boxy note drops away."""
    return x - depth * near * peak(x, boxy_hz, q)


def room(direct_db=-4, direct_s=0.00071, late_db=-15, wide_hz=800, bass_side_db=-12, absorb_hz=2200,
         treble_s=0.065, lumpy_db=3):
    """A first arrival smeared by the pot's rim, a lumpy cluster of near reflections, then a short tail."""
    t = TIME[:SR // 3]
    tail = undb(late_db) * np.exp(-np.log(1000) * t / ROOM_T60_S)
    walls = (1 - np.exp(-t / 0.00076)) * (np.exp(-t / EARLY_S) + tail)
    walls = walls * undb(lumpy_db * np.interp(t, t[::64], rng.standard_normal(len(t[::64]))))
    fade = unit(walls) + undb(direct_db) * unit(np.exp(-t / direct_s))
    mid, side = rng.standard_normal((2, len(t))) * fade
    # long waves are nearly alike at both ports
    bass_side = undb(bass_side_db) * band(side, wide_hz, "low", order=2)
    both = mid + SIDES * (band(side, wide_hz, "high", order=2) + bass_side)
    dull = band(both, absorb_hz, "low", order=1)
    return unit(dull + (both - dull) * np.exp(-t / treble_s))  # earthen walls swallow the treble first


def reflect(x, size=4096):
    """Shaft and microphone keep moving, so each pattern of reflections fades into the next."""
    out = np.zeros((2, N))
    for centre in range(0, N + size, size):
        span = np.arange(max(centre - size, 0), min(centre + size, N))
        fade = np.cos(np.pi / 2 * (span - centre) / size)
        add(out, span[0] / SR, through(x[span] * fade, room()))
    return out


def ports(x, presence_hz=2100, share=0.33):
    """The microphone's left port favours the upper midrange, the right one shades it."""
    return x + share * SIDES * peak(x, presence_hz, 1)


def scene(boom_room_db=-18, far_lag_s=0.00016, near_lag_s=0.0001, straight_db=-7, closer_db=2):
    """The pot's mouth faces the microphone; the wooden noises arrive mostly off the walls."""
    speeds = [spin(*pull[:3]) for pull in ROPE_PULLS]
    speed = np.interp(TIME, CONTROL_TIME, np.max(speeds, axis=0))
    near = nearness(TIME)
    full_slosh_db, full_rub_db, full_hiss_db = np.transpose(ROPE_PULLS)[3:]
    # the milk catches up with the paddle, so it sloshes hardest a little before full speed
    stirs = [spin(start, run_up - SLOSH_LEAD_S, run_down + SLOSH_LEAD_S)
             for start, run_up, run_down, *_ in ROPE_PULLS]
    slosh_db = driven(stirs, REST_SLOSH_DB, full_slosh_db, curve=0.43)
    rub_db = driven(speeds, REST_RUB_DB, full_rub_db, curve=0.55)
    hiss_db = driven(speeds, REST_HISS_DB, full_hiss_db, curve=0.81)
    hiss_db = hiss_db + RIM_SHADOW_DB * (TIME < BESIDE_UNTIL_S)

    boom = milk(slosh_db, BIG_GULPS + small_gulps(speed, slosh_db))
    knocks = clacks(HOLDER_KNOCKS + light_taps(speed, rub_db))
    friction = rubbing(rub_db + grip(speed)) + rasps()
    shaft = passed_holder(knocks + friction, near) + ticks()

    # the straight path keeps the knocks crisp; from nearby it is stronger and reaches the left port later
    straight = boom + shaft * undb(straight_db + closer_db * near)
    left = np.interp(TIME - far_lag_s - near_lag_s * near, TIME, straight)
    scattered = shaft + froth(hiss_db) + plinks() + undb(boom_room_db) * boom
    return np.array([left, straight]) + ports(reflect(scattered)) + rumble(slosh_db) + air()


def record(dry):
    """Drop the deepest bass, round the highest peaks and cut the top."""
    rounded = .85 * np.tanh(band(dry, 32, "high", order=4) / .85)
    return signal.sosfilt(signal.ellip(10, .2, 80, TOP_HZ, fs=SR, output="sos"), rounded)


dry = scene()
out = record(dry)
wav_record(out)
```